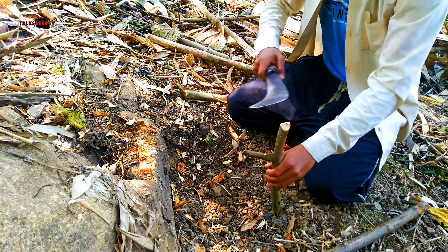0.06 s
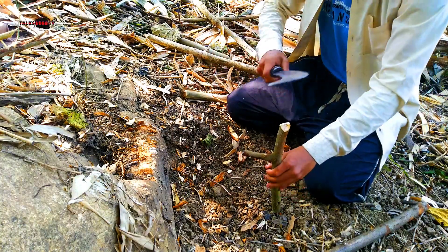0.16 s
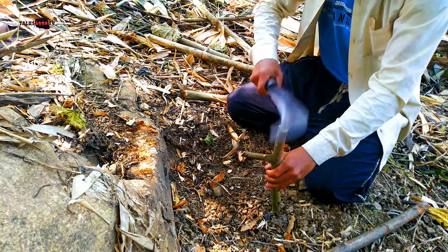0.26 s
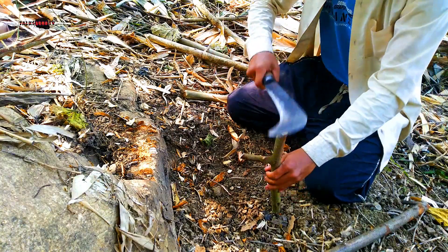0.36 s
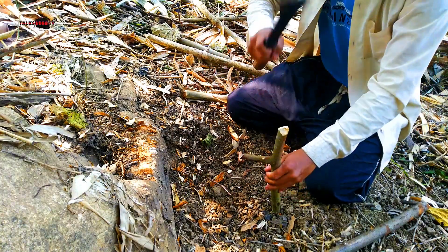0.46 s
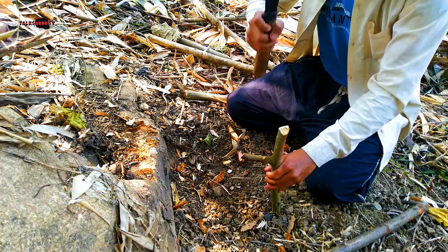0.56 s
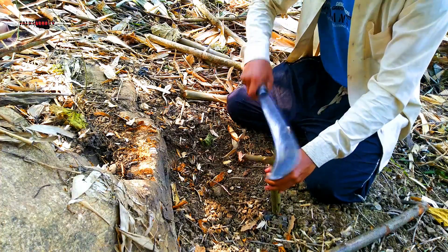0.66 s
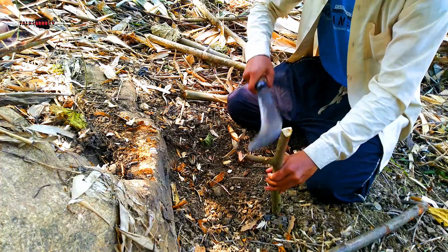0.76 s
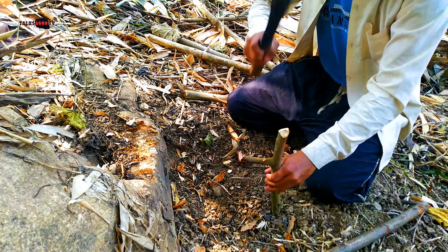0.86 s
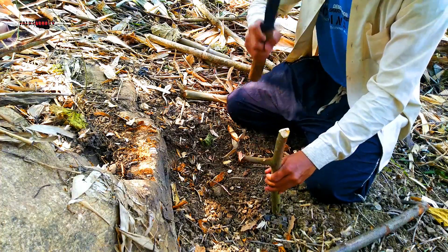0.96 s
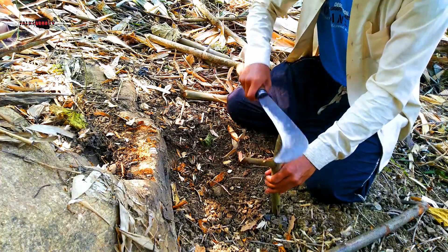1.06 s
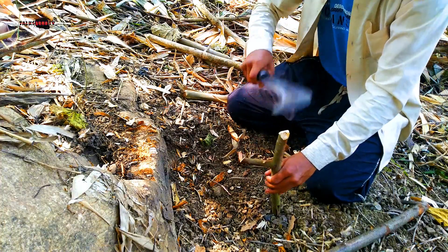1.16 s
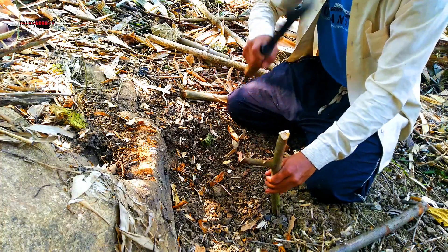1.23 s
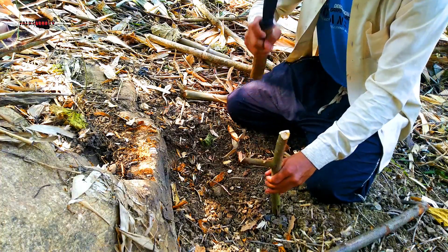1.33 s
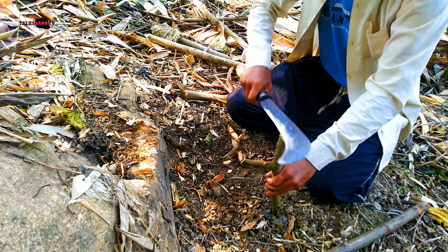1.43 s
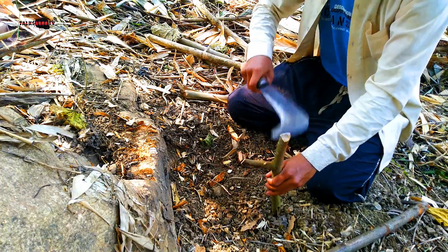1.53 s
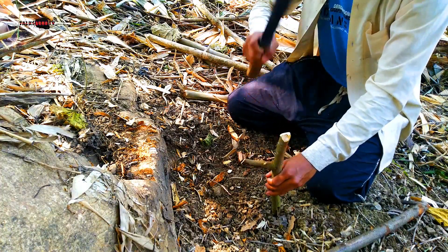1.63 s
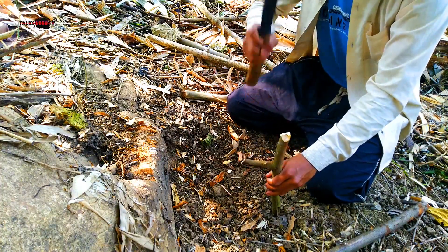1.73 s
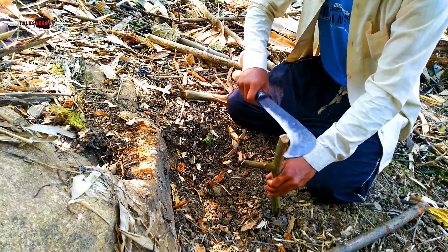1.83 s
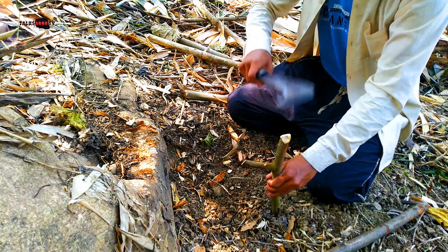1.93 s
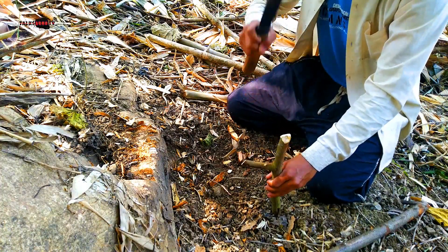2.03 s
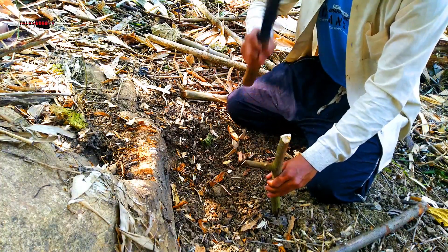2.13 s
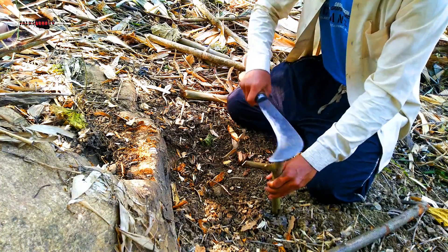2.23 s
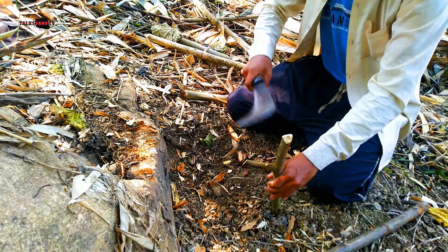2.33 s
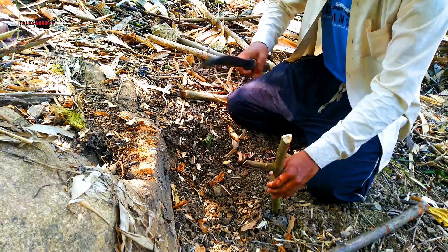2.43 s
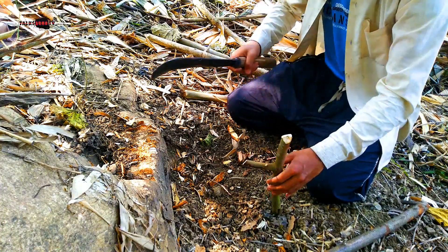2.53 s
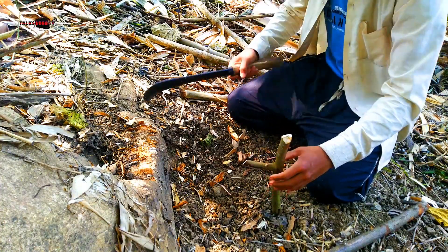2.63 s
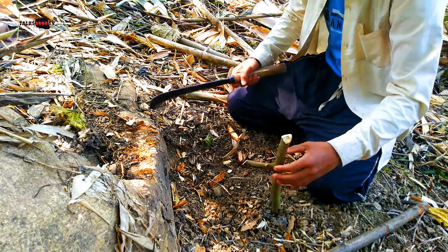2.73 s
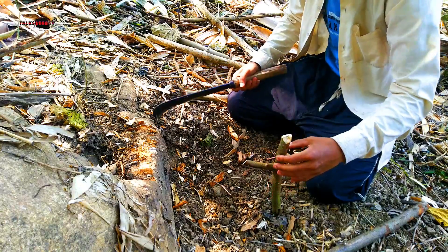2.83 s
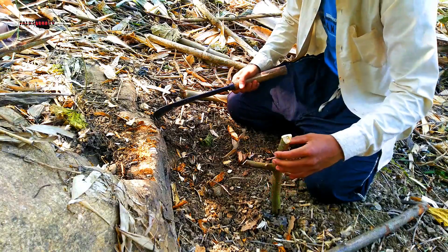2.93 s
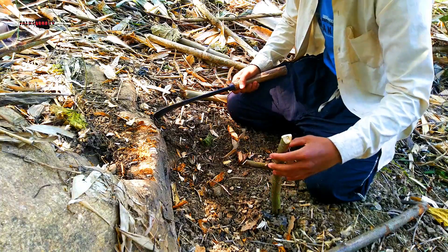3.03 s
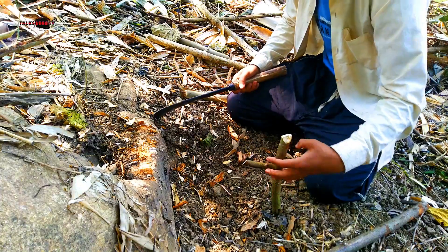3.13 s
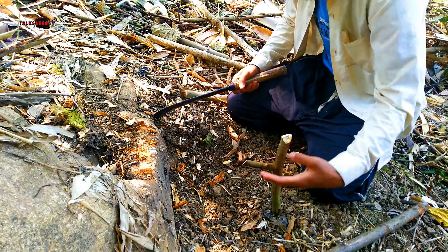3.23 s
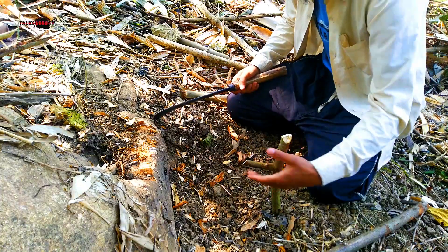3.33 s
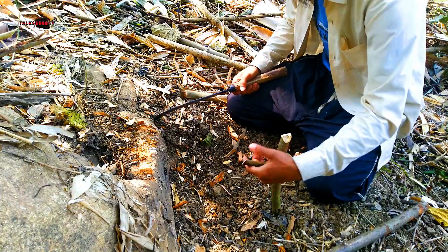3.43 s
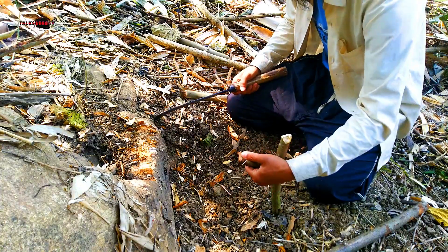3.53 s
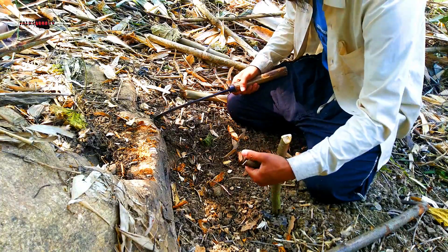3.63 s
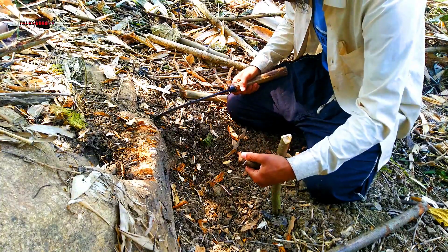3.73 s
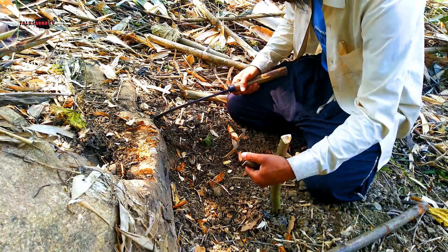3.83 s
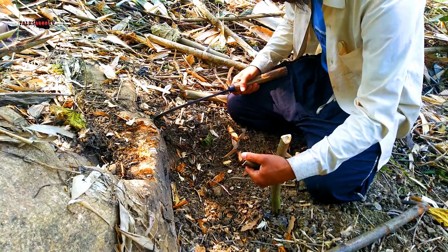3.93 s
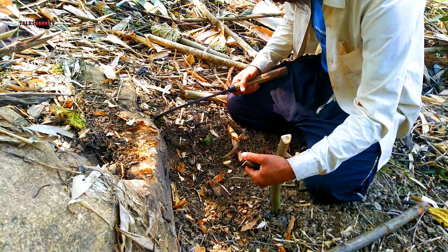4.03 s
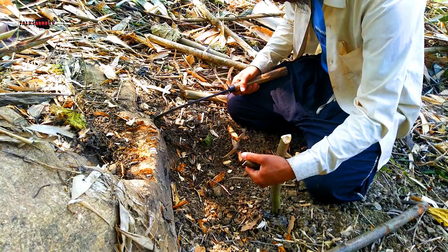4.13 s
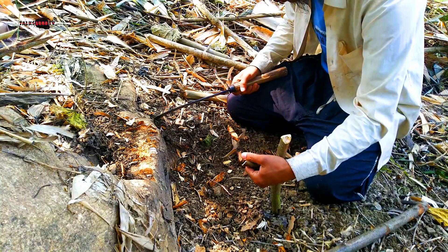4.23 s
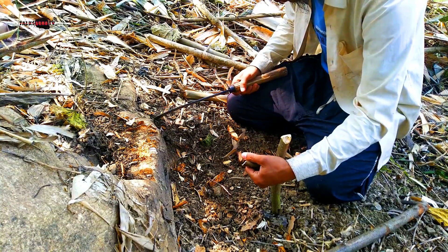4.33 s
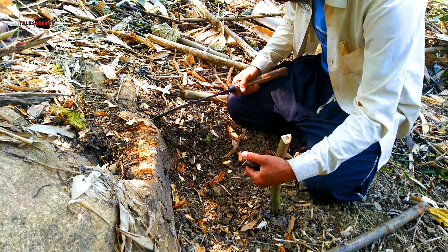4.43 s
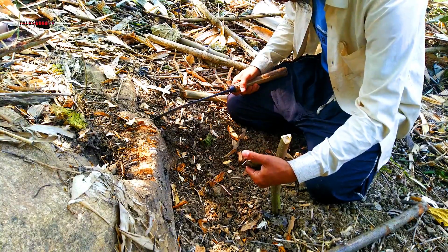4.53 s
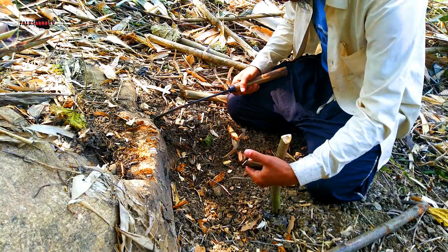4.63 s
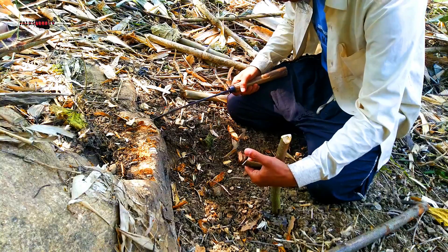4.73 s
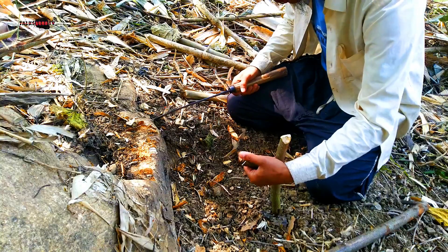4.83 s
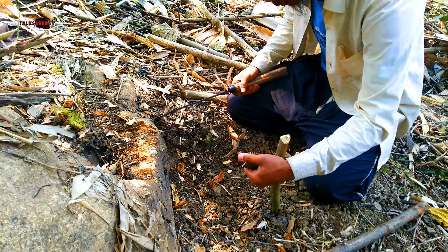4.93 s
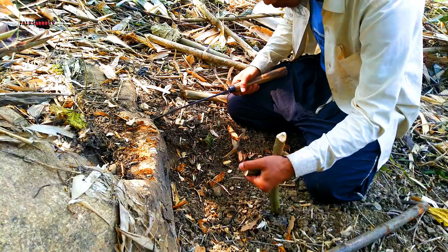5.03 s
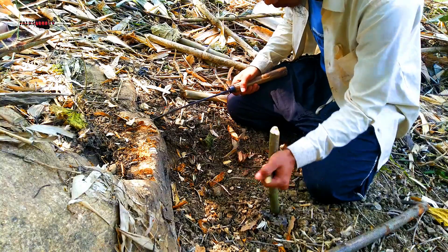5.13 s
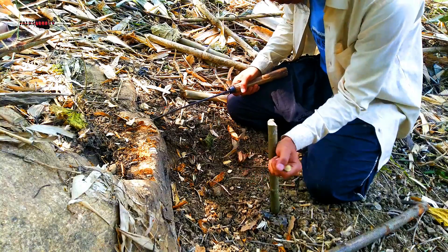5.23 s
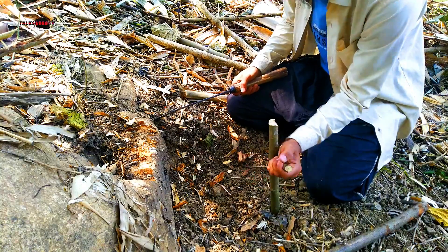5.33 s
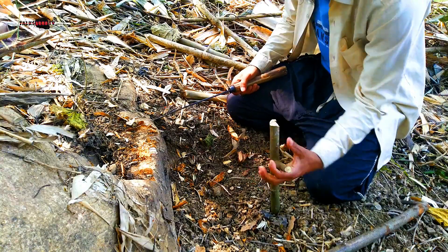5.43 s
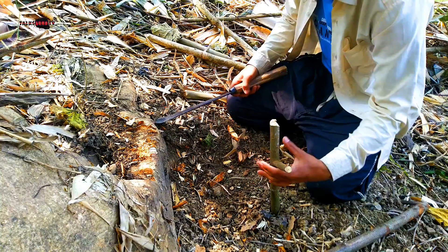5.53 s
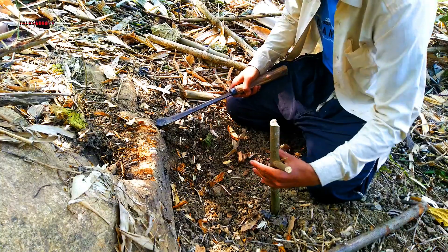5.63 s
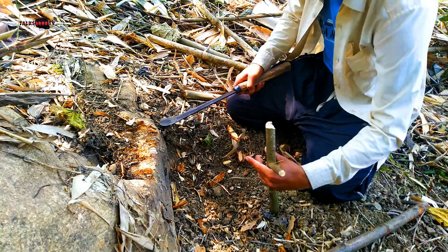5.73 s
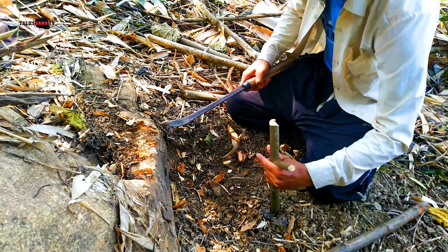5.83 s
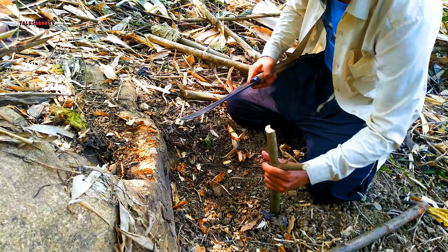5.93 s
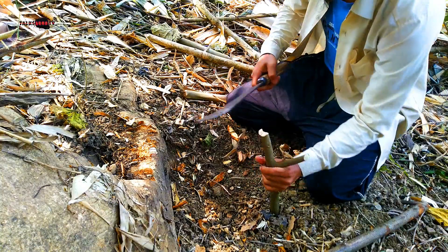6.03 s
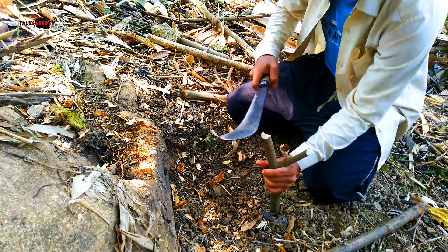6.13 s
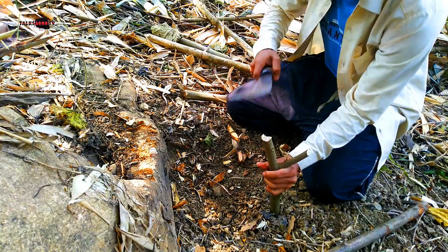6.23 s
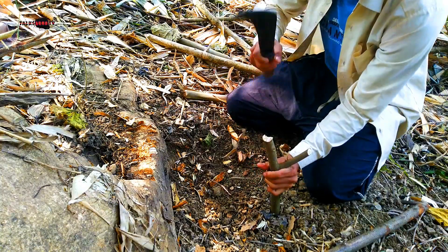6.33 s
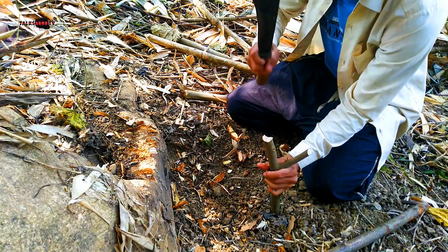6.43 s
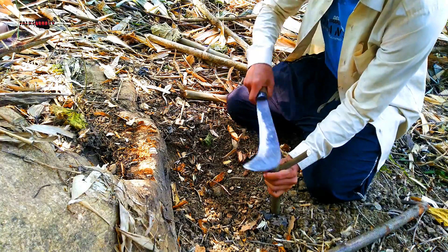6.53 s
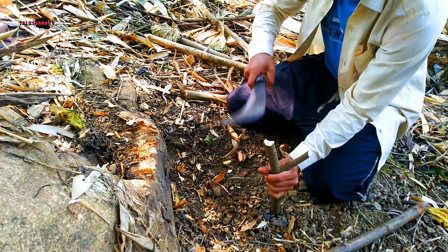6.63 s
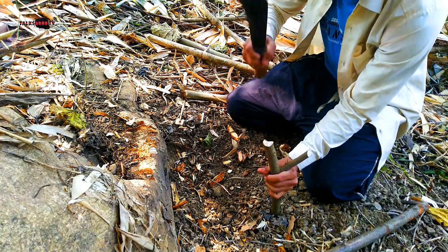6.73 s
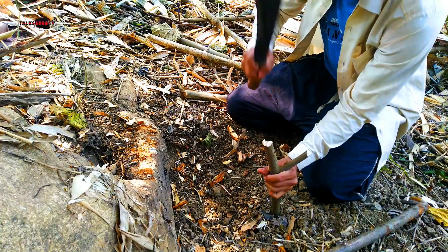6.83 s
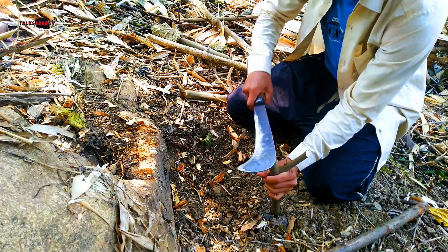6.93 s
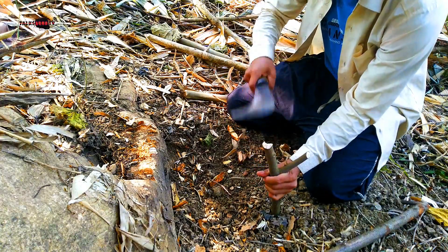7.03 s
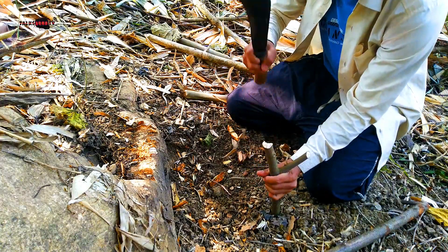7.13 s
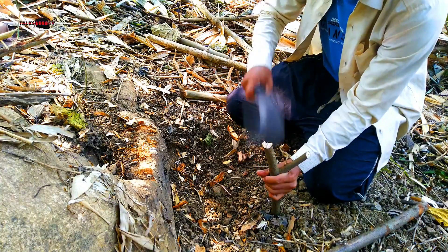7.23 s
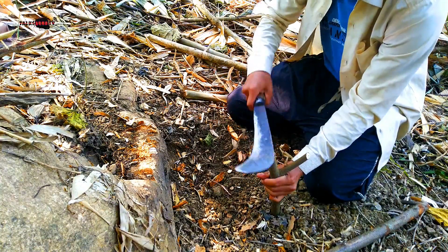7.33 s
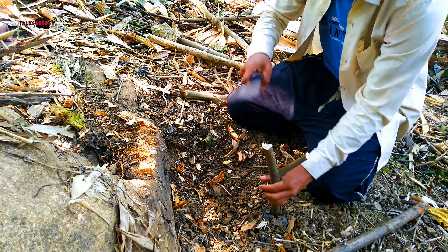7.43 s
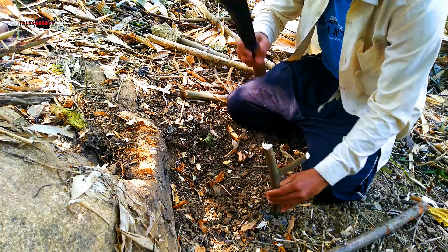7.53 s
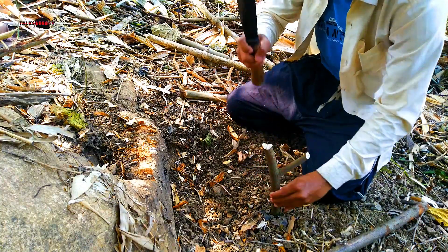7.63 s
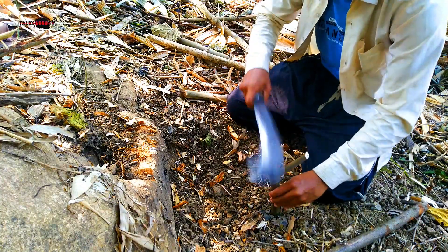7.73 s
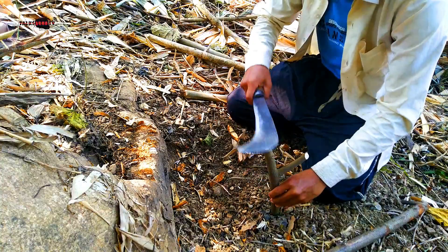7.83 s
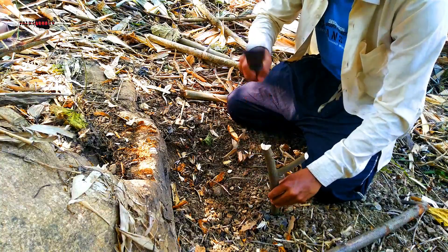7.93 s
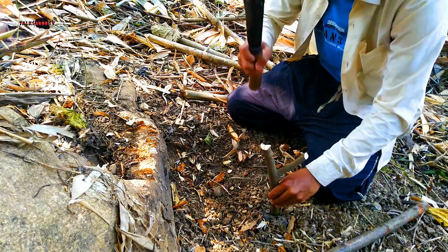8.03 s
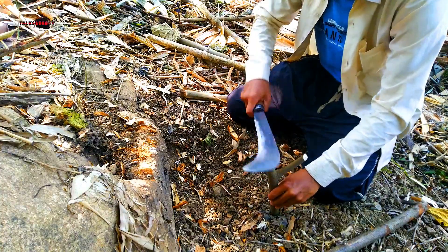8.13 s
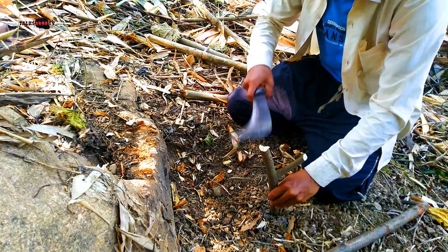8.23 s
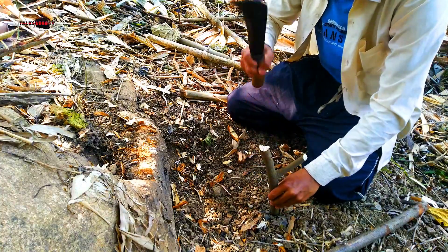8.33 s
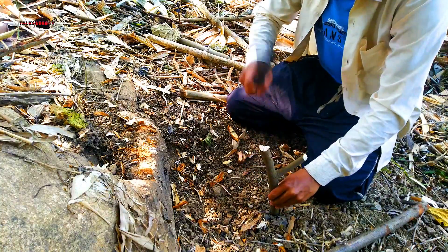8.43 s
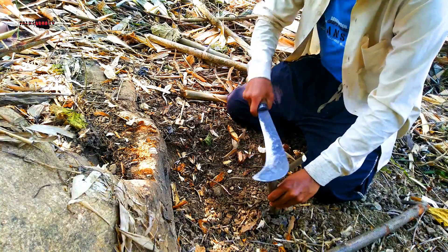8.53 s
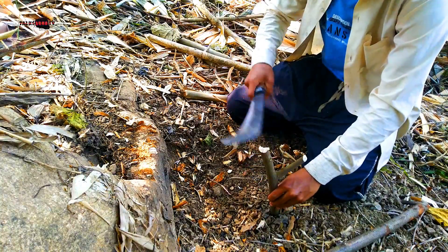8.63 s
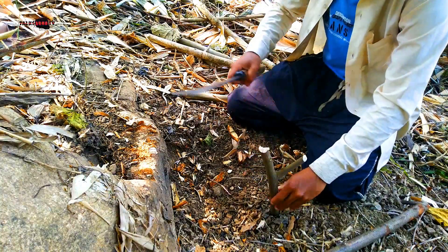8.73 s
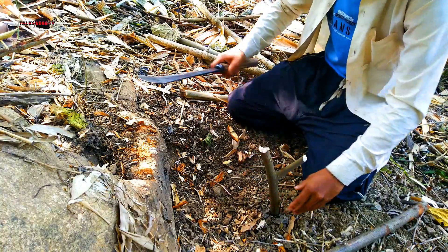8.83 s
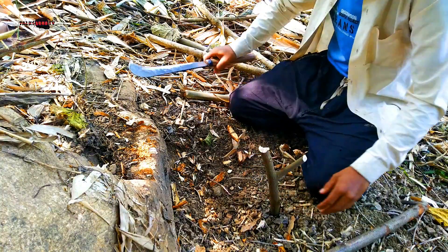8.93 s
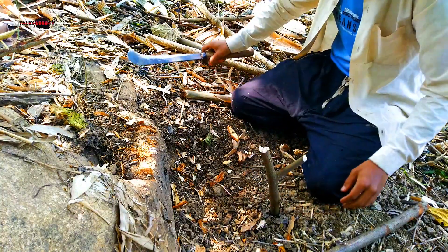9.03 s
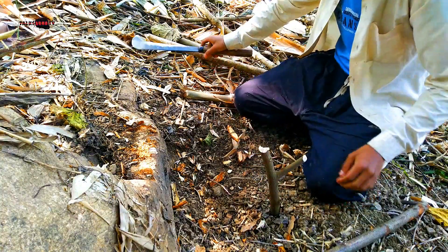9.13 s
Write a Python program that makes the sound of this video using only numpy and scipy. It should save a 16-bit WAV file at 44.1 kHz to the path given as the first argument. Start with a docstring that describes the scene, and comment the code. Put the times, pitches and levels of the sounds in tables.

```python
"""A bamboo stake, close to a stereo microphone, is driven into forest soil with the flat of a machete.
Two runs of six dry knocks: each rings damped stake modes, cracks the fibres and thumps the ground.
The thicket around scatters a faint noise tail, and a smooth broadband noise tail follows each blow.
Nearby feet crunch, bump and scuff in the leaves, made of shaped noise and low swings, with short extra
noise bursts; a loose hollow piece taps to rest, and a quiet outdoor hush lies under it all."""
import sys
import numpy as np
from scipy import signal
from scipy.fft import rfft, irfft, next_fast_len
from scipy.io import wavfile

SR = 44100
rng = np.random.default_rng(int(sys.argv[2]) if len(sys.argv) > 2 else 0)


def int16_out(signal):
    """Quantize to a 16-bit WAV file."""
    q = np.round(np.clip(np.atleast_2d(signal).T, -1, 1) * 32767)
    wavfile.write(sys.argv[1], SR, q.astype(np.int16))


N = 404397
TIME = np.arange(N) / SR

# Outdoor hush, spectrum: freq_hz, relative level_db
HUSH_SPECTRUM = [(20, -13.5), (40, -4), (60, 8.5), (150, -0.5), (350, -5), (600, -4), (1400, -7),
                 (2500, -6.5), (4500, -10.5), (10000, -22), (16000, -24)]
HUSH_DB = -56.5
# Getting up stirs the leaves more and more: start, time that full strength takes, full levels
RISE_FROM_S, RISE_S, RISE_RUSTLE_DB, RISE_RUB_DB = 8.5, 0.71, -49.5, -47.5

# Steps in the litter: start_s, build_up_s, relative crunch_db, centre_hz, relative footfall_db
STEPS = [(0.067, .013, -33, 1490, -38.5), (0.636, 0.011, -42.5, 1300, -43.5),
         (1.102, 0.011, -34, 1720, -38), (2.175, 0.0077, -27.5, 1660, -43.5),
         (2.321, 0.0082, -33.5, 1290, -46), (2.978, 0.014, -41.5, 1340, -39.5),
         (3.142, 0.01, -36.5, 1230, -41), (3.26, 0.0063, -25, 1450, -38),
         (3.998, 0.013, -36.5, 1060, -35.5), (4.144, 0.01, -28.5, 1610, -46),
         (4.287, 0.0091, -32, 1080, -40.5), (4.976, 0.014, -38.5, 1190, -34.5),
         (5.077, 0.013, -40, 1220, -41), (5.163, 0.011, -28.5, 1550, -38), (5.808, 0.015, -36.5, 1460, -34),
         (5.904, 0.022, -36.5, 1350, -43.5), (6.695, 0.013, -27, 1610, -46.5),
         (6.722, 0.018, -36, 1150, -36), (7.586, 0.019, -36, 1420, -36), (7.875, 0.0073, -23.5, 1700, -39),
         (8.079, 0.0099, -36, 1400, -40.5), (8.566, 0.031, -37, 1700, -36),
         (8.653, 0.033, -39.5, 1600, -54), (8.797, 0.023, -37, 1840, -49),
         (8.864, 0.027, -42.5, 1250, -34.5), (8.952, 0.0087, -24.5, 1780, -41.5)]
# Resonances of the hollow under the litter: freq_hz, level_db
HOLLOW_RESONANCES = [(400, -6.5), (850, 9), (1120, 2), (1350, -5.5), (1650, 4.5), (2000, 3.5), (2400, -4),
                     (2700, 1), (3300, -6), (4500, -5.5)]
# Leaves settling, spectrum: freq_hz, relative level_db
LITTER_SPECTRUM = [(150, -11), (330, -7.5), (450, 0), (640, -0.5), (1100, 3.5), (1350, 0.5), (1600, 3),
                   (2400, 0), (4000, -8.5), (9000, -19.5), (16000, -55.5)]
# Leaves crackling, spectrum: freq_hz, relative level_db
CRACKLE_SPECTRUM = [(1000, -23), (2500, -1.5), (4500, 1.5), (10000, -14.5), (16000, -16)]
# Soil under a foot, spectrum: freq_hz, relative level_db
FOOTFALL_SPECTRUM = [(25, -36.5), (50, -7), (80, 4), (130, -2.5), (210, -7.5), (350, -19.5), (900, -50.5)]
# An ordinary step: relative crunch and build-up
STEP_DB, STEP_S = -34, 0.013
# Leaves disturbed by a step: dB gained per dB of crunch, and dB per doubling of the build-up
STIR_PER_DB, STIR_DB_PER_DOUBLING = 0.63, 3

# Blows: start_s, seating (0 or 1), pitch_factor, strength_db, brightness_db_per_octave, relative thump_db
STAKE_BLOWS = [(0.2998, 0, 0.933, -4, -2.5, -12), (0.6766, 0, 0.922, 4.5, 0.5, -15.5),
               (1.0576, 0, 1.04, 4.5, 1, -15), (1.4291, 0, 1.04, 6, 2, -15),
               (1.808, 0, 1.06, 5, 0.5, -13.5), (2.204, 0, 0.99, 3.5, 1.5, -16.5),
               (6.5299, 1, 0.9, -3.5, -4, -19.5), (6.8928, 1, 1, 3.5, -0.5, -19),
               (7.2572, 1, 1.016, 3, 1, -18), (7.7471, 1, 1.01, 4, 0.4, -13), (8.1206, 1, 1, 4.5, 0, -13.5),
               (8.471, 1, 1.005, 4.5, 1, -12)]
# Stake modes before the pitch factor: pitch_hz, t60_s, first_seating_db, turned_in_hole_db
STAKE_MODES = [(407, 0.014, -18.5, -20.5), (602, 0.03, -56.5, -33), (785, 0.015, -16, -21),
               (1070, 0.014, -16, -19), (1283, 0.015, -18, -12), (1457, 0.023, -22.5, -22),
               (1830, 0.013, -15.5, -11), (2044, 0.025, -23, -44), (2576, 0.011, -12, -9.5),
               (2890, 0.01, -25, -18.5), (3310, 0.0054, -17, -58), (3680, 0.015, -29, -29),
               (4280, 0.012, -35, -15), (4863, 0.011, -17, -17), (5720, 0.011, -51, -17),
               (5850, 0.009, -19, -12)]
# Fibres cracking, spectrum: freq_hz, relative level_db
CRACK_SPECTRUM = [(300, -35), (1000, -7), (3000, 10), (6000, 1), (10000, -11), (16000, -14.5)]
# Noise tail of a blow, also the grit of the scuff, spectrum: freq_hz, relative level_db
TAIL_SPECTRUM = [(400, -9.5), (1400, 3), (3000, -1.5), (5500, -2.5), (10000, -19.5), (16000, -17)]
# Swing of the soil around the stake; brightness tilts the modes about the second frequency
SOIL_HZ, TILT_HZ = 160, 1800
# The push comes back from the buried end of the stake: delay and share (0-1)
RETURN_S, RETURN_SHARE = 0.00135, 0.19
# Level of the close stake between the two microphone ports: freq_hz, left_minus_right_db
STAKE_PORT_BALANCE = [(60, 0), (150, -1), (380, -3), (700, -6), (1300, -3), (2400, -3.5), (4500, -2.5),
                      (13000, 1)]
# Phase of the close stake between the two microphone ports: freq_hz, left_lead_rad
STAKE_PORT_PHASE = [(200, 0.38), (700, 0.88), (1300, 0.8), (2400, 0.81), (4500, 1.37), (11000, 2.95)]
# Scatter from stems and leaves, spectrum: freq_hz, relative level_db
THICKET_SPECTRUM = [(60, 17), (170, 6), (350, -15.5), (700, -9), (1500, -4), (2600, -3.5), (3800, -0.5),
                    (5700, -2.5), (8500, -3), (16000, -8.5)]

# Short noise bursts, the leading edge or extra crackle of a step: start_s, centre_hz, t60_s, level_db
STEP_BURSTS = [(0.623, 2600, .14, -44), (1.108, 6000, .4, -52.5), (7.828, 4300, 0.2, -45)]

# Loose hollow piece: first tap, first gap, each gap as a share of the last
RATTLE_FROM_S, RATTLE_GAP_S, RATTLE_SHRINK = 4.388, 0.051, 0.84
# Its ring: pitch, sharpness Q, t60 in seconds, first tap, loss per tap
RATTLE_HZ, RATTLE_Q, RATTLE_T60, RATTLE_DB, RATTLE_LOSS_DB = 996, 10, 0.12, -48, 1.2

# Dull bumps of shifting weight: centre_s, half_length_s, pitch_hz, level_db
WEIGHT_BUMPS = [(7.496, .01, 103, -40), (8.852, .012, 85, -36), (8.894, .02, 96, -40)]
# Lighter bumps in a row while getting up: first one, spacing, half length, pitch, level
SHUFFLE_FROM_S, SHUFFLE_GAP_S, SHUFFLE_LENGTH_S, SHUFFLE_HZ, SHUFFLE_DB = 8.23, 0.12, 0.012, 68.5, -47

# Shifting feet scuff the litter: middle, half length, level at the middle
SCUFF_S, SCUFF_LENGTH_S, SCUFF_DB = 8.76, 0.14, -54

# Microphone response: freq_hz, level_db
MICROPHONE_RESPONSE = [(20, 10.5), (45, -1), (70, 0.5), (5000, 0.5), (6200, -1.5), (7200, -4), (8200, -7.5),
                       (10000, 6), (12500, 5), (16000, -11.5)]
TOP_HZ = 16100  # upper limit of the microphone


def undb(db):
    """Decibels to gain."""
    return 10 ** (np.asarray(db) / 20)


def unit(x):
    """Scale to an rms of one."""
    return x / np.sqrt(np.mean(x ** 2))


def fade(t, t60):
    """Exponential decay that starts at t = 0 and falls 60 dB in t60 seconds."""
    return (t >= 0) * np.exp(-np.log(1000) * np.abs(t) / t60)


def colour(x, points):
    """Causal minimum-phase filter that follows (Hz, dB) points."""
    size = next_fast_len(x.shape[-1] // 2 + 2048) * 2
    hz, db = np.transpose(points)
    bin_hz = np.arange(size // 2 + 1) * SR / size
    gain = undb(np.interp(np.log(bin_hz + 1), np.log(hz), db))
    # folding the cepstrum forward in time makes the filter causal
    cepstrum = irfft(np.log(gain))
    cepstrum[1:size // 2] *= 2
    cepstrum[size // 2 + 1:] = 0
    response = np.exp(rfft(cepstrum))
    return irfft(rfft(x, size) * response)[..., :x.shape[-1]]


def resonate(x, hz, q):
    """Two-pole band-pass."""
    return signal.lfilter(*signal.iirpeak(hz, q, fs=SR), x)


def air(count, grain_db=0., alike_hz=750):
    """Diffuse stereo noise, more alike in the bass; grain_db breaks it into ticks of unequal size."""
    grains = np.repeat(rng.exponential(size=count // 16 + 1), 16)[:count]
    sizes = undb(grain_db * grains.clip(0, 5))
    mid, side = rng.standard_normal((2, count)) * sizes
    wide = signal.lfilter(*signal.butter(1, alike_hz, "high", fs=SR), side)
    side = 0.19 * side + 0.85 * wide
    return unit(np.array([mid + side, mid - side]))


def pan(db):
    """Channel gains for a left minus right level."""
    return undb(np.array([[db], [-db]]) / 2)


def add(out, start, sound):
    """Mix a sound in at a time in seconds."""
    i = int(round(start * SR))
    sound = sound[..., max(-i, 0):N - i]
    first = max(i, 0)
    out[:, first:first + sound.shape[-1]] += sound


def ambience(pan_db=-1.5, rise_power=3.8):
    """A smooth outdoor hush; leaves rub and rustle more and more as the worker gets up."""
    effort = np.clip((TIME - RISE_FROM_S) / RISE_S, 0, 1) ** rise_power
    # the dull rubbing shares the noise of the hush, so the two add in power
    hush_gain = np.hypot(undb(HUSH_DB), effort * undb(RISE_RUB_DB))
    hush = hush_gain * unit(colour(air(N), HUSH_SPECTRUM))
    rustle = effort * undb(RISE_RUSTLE_DB) * unit(colour(air(N, grain_db=3.5), CRACKLE_SPECTRUM))
    return pan(pan_db) * (hush + rustle)


def crunches(body_q=1.87, body_t60=0.048, body_db=2.5, settle_db=-42, settle_t60=0.47,
             crackle_db=-50.0, crackle_t60=0.61, foot_db=-1, foot_t60=0.041, foot_tail_db=-11,
             foot_tail_t60=0.58, foot_lead_s=0.0055, snap_s=0.0016, pan_db=-3):
    """A foot loads the litter until it gives with a hollow crunch; leaves crackle and settle, the soil thuds."""
    out, t = np.zeros((2, N)), np.arange(-SR // 20, SR // 2) / SR
    for start, build, crunch_db, hz, thud_db in STEPS:
        # a quick step gives way with a sudden snap, a slow one swells
        load = (t < 0) * np.exp(-2 * np.abs(t) / build) * build / (build + snap_s)
        snaps = colour(air(len(t), grain_db=3.0, alike_hz=1210), HOLLOW_RESONANCES)
        body = unit(resonate(resonate(snaps, hz, body_q), hz, body_q / 2))
        body = body * (load + fade(t, body_t60)) * undb(crunch_db + body_db)
        # harder and slower steps disturb more leaves
        stir_db = STIR_PER_DB * (crunch_db - STEP_DB) + STIR_DB_PER_DOUBLING * np.log2(build / STEP_S)
        leaves = unit(colour(air(len(t), grain_db=2.0), LITTER_SPECTRUM))
        leaves = leaves * (load + fade(t, settle_t60)) * undb(stir_db + settle_db)
        ticks = unit(colour(air(len(t), grain_db=2.0), CRACKLE_SPECTRUM))
        ticks = ticks * (load + fade(t, crackle_t60)) * undb(stir_db + crackle_db)
        weight = load ** 2 + fade(t, foot_t60) + undb(foot_tail_db) * fade(t, foot_tail_t60)
        soil = unit(colour(air(len(t), alike_hz=2500), FOOTFALL_SPECTRUM))
        soil = soil * weight * undb(thud_db + foot_db)
        add(out, start + t[0], pan(pan_db) * (body + leaves) + ticks)
        add(out, start + t[0] - foot_lead_s, soil)
    return out


def knock(t, seating, pitch, strength_db, bright_db, ring_db=0.0, crack_db=-19.0, crack_t60=0.023,
          crack_follow=0.4, crack_octaves=0.95, mode_scatter_db=3.0, port_scatter_db=2.0):
    """The blade's push rings the stake and comes back inverted from its buried end; the fibres crack."""
    hz, t60, *seated_db = np.transpose(STAKE_MODES)
    db = seated_db[int(round(seating))] + strength_db + bright_db * np.log2(hz / TILT_HZ)
    # each mode starts at a random phase, more scattered toward the high modes
    phase = hz[:, None] / 6000 * rng.standard_normal((len(hz), 1))
    modes = np.cos(2 * np.pi * pitch * hz[:, None] * t + phase) * fade(t, t60[:, None])
    # no two blows land alike, and each port hears the modes in a slightly different balance
    db = db + mode_scatter_db * rng.standard_normal(len(hz))
    db = db + port_scatter_db * rng.standard_normal((2, len(hz)))
    ring = undb(ring_db + db) @ modes
    returned = np.array([np.interp(t - RETURN_S, t, side, left=0) for side in ring])
    ring = ring - RETURN_SHARE * returned
    # the blade's brief contact, in samples, softens the attack
    contact = np.hanning(7)
    ring = signal.lfilter(contact / contact.sum(), 1, ring)
    crack = unit(colour(air(len(t), alike_hz=5070), CRACK_SPECTRUM)) * fade(t, crack_t60)
    crack_level_db = crack_db + crack_follow * (strength_db + crack_octaves * bright_db)
    return ring + crack * undb(crack_level_db)


def thump(t, t60=0.034, build_s=0.0065, db=12.5, shudder_hz=105, shudder_t60=0.11, shudder_db=-10):
    """The soil takes up the blow slowly and swings for two or three cycles over a deeper shudder."""
    swing = np.sin(2 * np.pi * SOIL_HZ * t - np.pi / 2 + np.pi / 10)
    swing = undb(db) * swing * fade(t, t60)
    shudder = unit(resonate(rng.standard_normal(len(t)), shudder_hz, 3.6))
    shudder = undb(shudder_db) * shudder * fade(t, shudder_t60)
    shudder = signal.lfilter(*signal.butter(2, 300, fs=SR), shudder)
    return (swing + shudder) * (1 - np.exp(-(t / build_s) ** 3))


def ports(x):
    """Give a close source its level and phase difference between the two microphone ports."""
    log_hz = np.log(np.arange(N + 1) * SR / (2 * N) + 1)
    balance_hz, balance_db = np.transpose(STAKE_PORT_BALANCE)
    phase_hz, phase_rad = np.transpose(STAKE_PORT_PHASE)
    db = np.interp(log_hz, np.log(balance_hz), balance_db)
    phase = np.interp(log_hz, np.log(phase_hz), phase_rad)
    # each port takes half of the difference
    half = undb(db / 2) * np.exp(.5j * phase)
    return irfft(rfft(x, 2 * N) * np.array([half, 1 / half]))[:, :N]


def pounding(tail_db=-53.5, tail_t60=0.58, tail_follow=1.0):
    """All blows on the stake; each one is followed by a smooth, broadband noise tail that decays."""
    out, tails, t = np.zeros((2, N)), np.zeros((2, N)), np.arange(SR // 2) / SR
    for start, seating, pitch, strength_db, bright_db, thump_db in STAKE_BLOWS:
        blow = knock(t, seating, pitch, strength_db, bright_db) + undb(thump_db) * thump(t)
        add(out, start, blow)
        tail = unit(colour(air(len(t), grain_db=2.0), TAIL_SPECTRUM)) * fade(t, tail_t60)
        add(tails, start, tail * undb(tail_db + tail_follow * (strength_db + bright_db)))
    return ports(out) + tails


def thicket(x, db=-26, t60=0.46, ground_db=-14, ground_t60=0.06, delay_s=0.0067):
    """Stems and leaves scatter a thin tail; the ground rumbles on a little."""
    t = np.arange(SR // 2) / SR
    scatter = colour(air(len(t), grain_db=1.0), THICKET_SPECTRUM)
    scatter = scatter * unit(fade(t - delay_s, t60)) * undb(db)
    rumble = resonate(air(len(t), alike_hz=3000), 87, 0.81)
    rumble = rumble * unit(fade(t - delay_s, ground_t60)) * undb(ground_db)
    return signal.fftconvolve(x, (scatter + rumble) / np.sqrt(len(t)), axes=1)[:, :N]


def noise_ring(hz, q, t60):
    """A brief dry ring, grainy rather than clean: twice band-passed noise that decays."""
    t = np.arange(SR // 4) / SR
    return unit(resonate(resonate(air(len(t)), hz, q), hz, q / 2)) * fade(t, t60)


def step_bursts(pan_db=-2, q=.92):
    """Short noise bursts in broad bands: the leading edge or extra crackle of a step in the litter."""
    out = np.zeros((2, N))
    for start, hz, t60, db in STEP_BURSTS:
        add(out, start, pan(pan_db) * noise_ring(hz, q, t60) * undb(db))
    return out


def rattle(pan_db=-2, count=5):
    """A loose hollow piece rocks to rest in ever quicker, weaker taps."""
    out, start = np.zeros((2, N)), RATTLE_FROM_S
    for k in range(count):
        tap = noise_ring(RATTLE_HZ, RATTLE_Q, RATTLE_T60) * undb(RATTLE_DB - k * RATTLE_LOSS_DB)
        add(out, start, pan(pan_db) * tap)
        start = start + RATTLE_GAP_S * RATTLE_SHRINK ** k
    return out


def bumps(count=9, jitter_s=0.0132):
    """The soil swings for a few low cycles as the weight shifts."""
    out, t = np.zeros((2, N)), np.arange(-SR // 8, SR // 8) / SR
    starts = SHUFFLE_FROM_S + SHUFFLE_GAP_S * np.arange(count) + jitter_s * rng.standard_normal(count)
    shuffle = [(start, SHUFFLE_LENGTH_S, SHUFFLE_HZ, SHUFFLE_DB) for start in starts]
    for start, length, hz, db in list(WEIGHT_BUMPS) + shuffle:
        swing = np.sqrt(2) * np.sin(2 * np.pi * (hz * t + rng.random()))
        add(out, start + t[0], undb(db) * swing * np.exp(-(t / length) ** 2))
    return out


def scuff(pan_db=-2):
    """Soles drag through the litter in a gritty swell."""
    swell = np.exp(-((TIME - SCUFF_S) / SCUFF_LENGTH_S) ** 4)
    grit = unit(colour(air(N, grain_db=4.5), TAIL_SPECTRUM))
    return pan(pan_db) * undb(SCUFF_DB) * swell * grit


def scene():
    """Blows and their scatter, footwork, the rattle and the surrounding hush."""
    blows = pounding()
    stake = blows + thicket(blows)
    footwork = crunches() + step_bursts() + scuff() + bumps()
    return stake + footwork + rattle() + ambience()


def record(dry):
    """The microphone thins the deep bass, dips near 8 kHz, rounds the loudest peaks and cuts the top."""
    ceiling = .92
    sound = ceiling * np.tanh(colour(dry, MICROPHONE_RESPONSE) / ceiling)
    sound = signal.lfilter(*signal.butter(3, 38, "high", fs=SR), sound)
    return signal.sosfilt(signal.ellip(8, .2, 70, TOP_HZ, fs=SR, output="sos"), sound)


dry = scene()
out = record(dry)
int16_out(out)
```